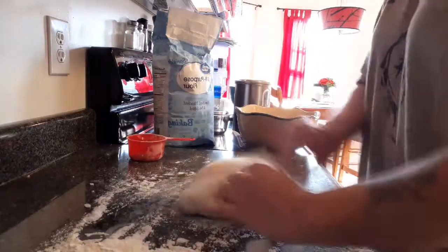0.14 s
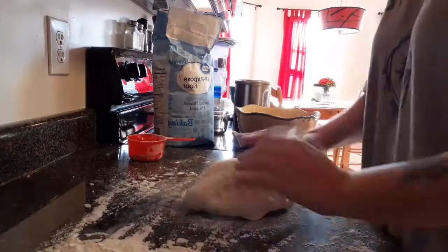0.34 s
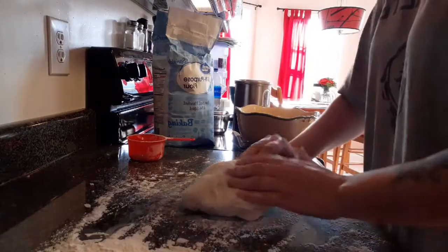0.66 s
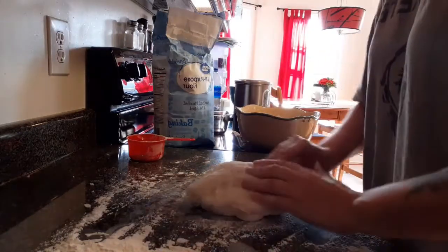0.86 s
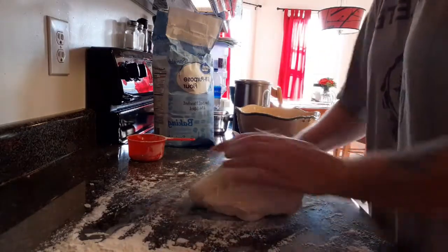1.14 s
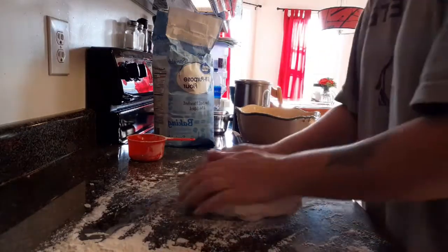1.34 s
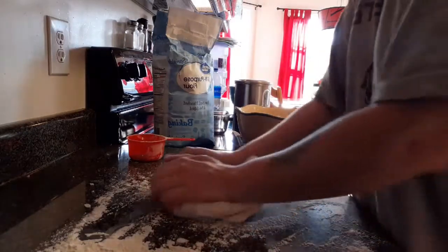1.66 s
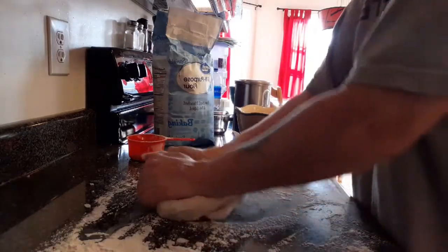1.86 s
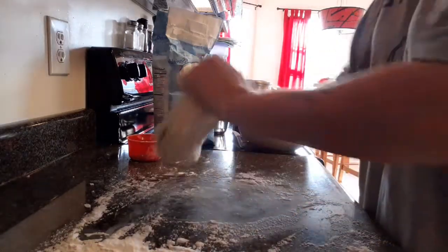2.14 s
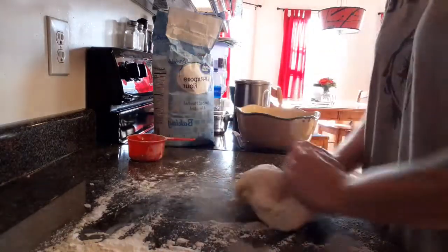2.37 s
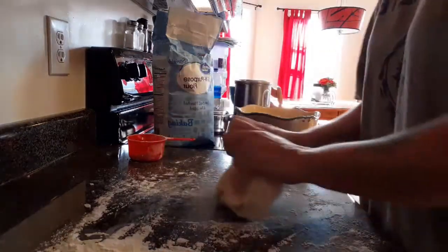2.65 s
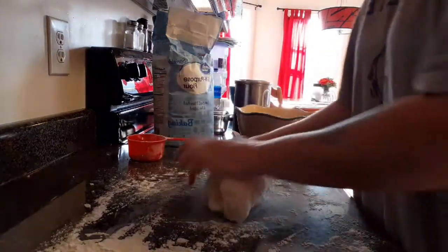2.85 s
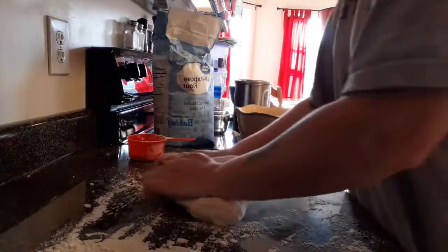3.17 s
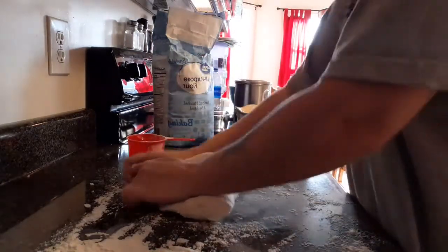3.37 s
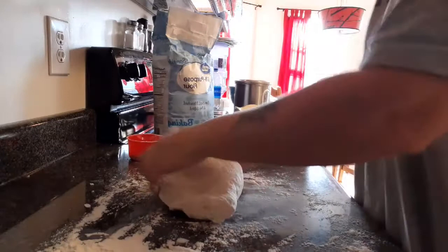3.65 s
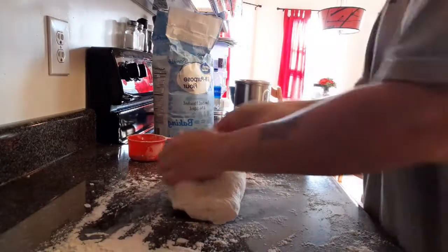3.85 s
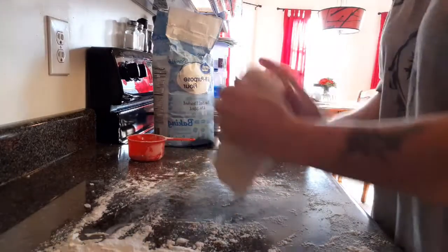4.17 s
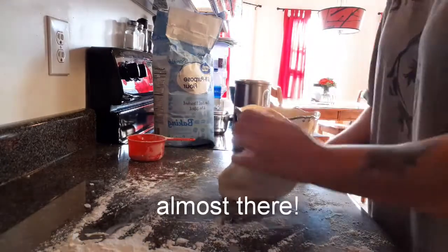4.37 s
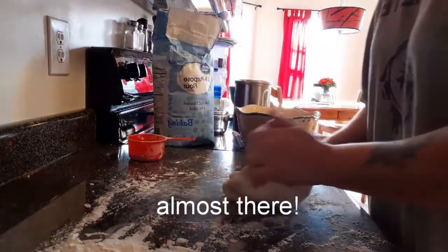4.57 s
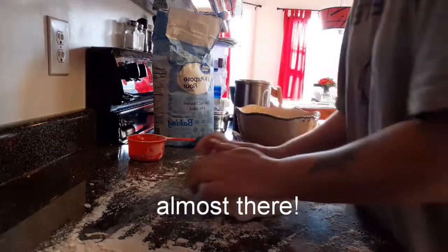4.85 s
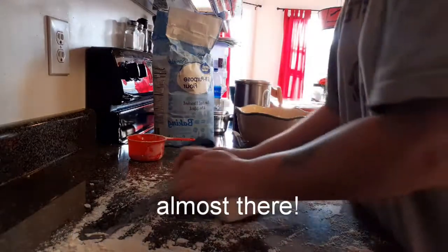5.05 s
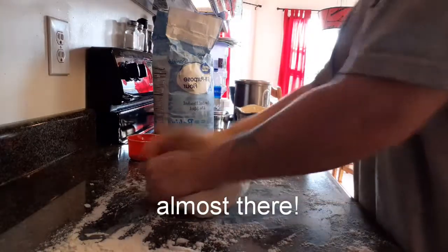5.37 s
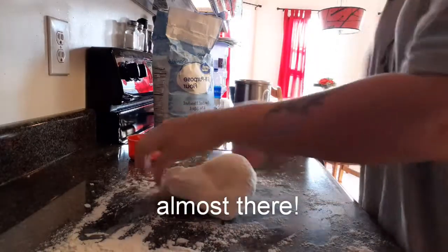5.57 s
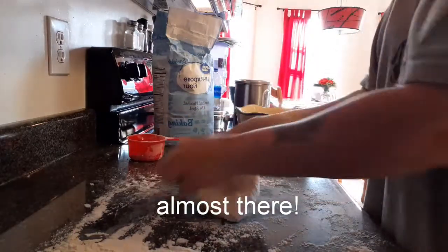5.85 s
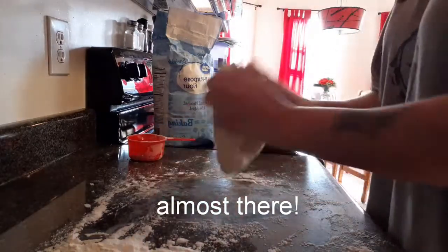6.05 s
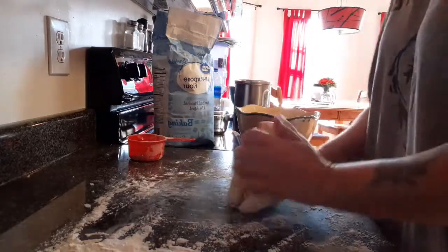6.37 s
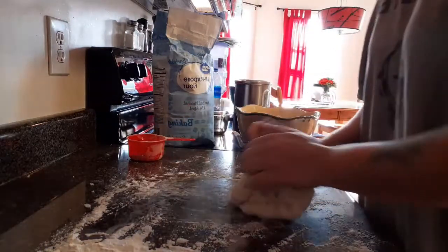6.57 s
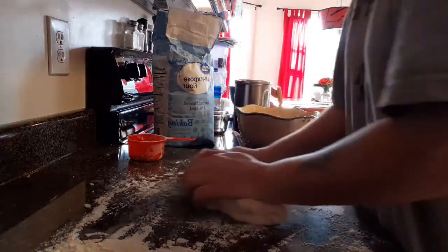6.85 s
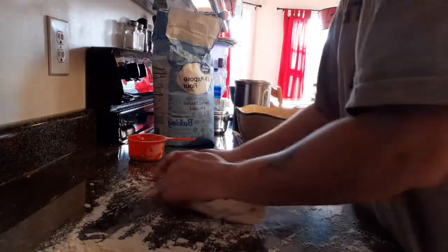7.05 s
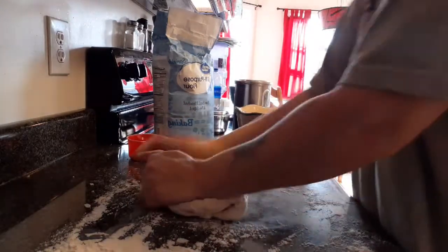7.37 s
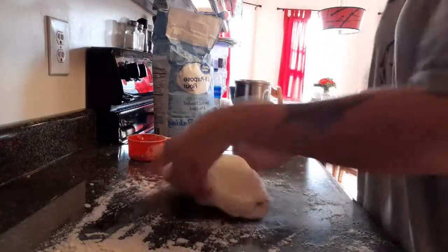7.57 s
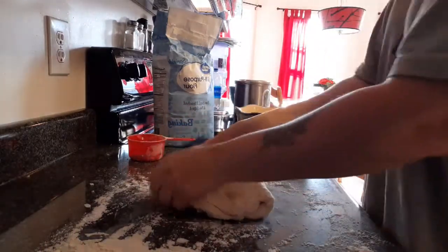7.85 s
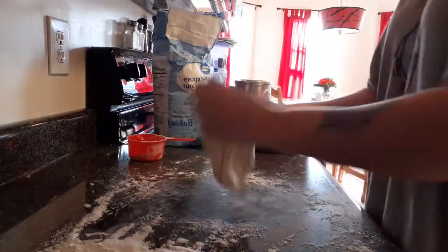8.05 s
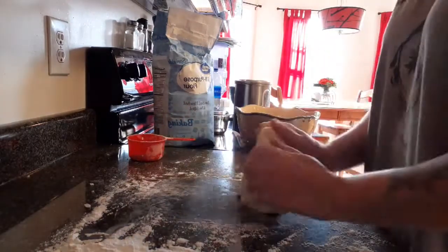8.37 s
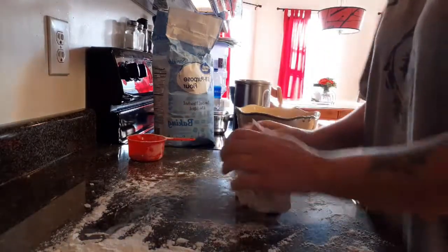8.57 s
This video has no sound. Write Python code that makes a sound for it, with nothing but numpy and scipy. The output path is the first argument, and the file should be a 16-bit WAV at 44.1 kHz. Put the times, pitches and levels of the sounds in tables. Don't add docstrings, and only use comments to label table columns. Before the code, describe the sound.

Close stereo phone pickup in a small kitchen with short reflections. A fridge hums low throughout, its thin whine clearest around 2.6-4 s, over faint microphone hiss. Palms scuff flour at the start; at 0.7 s dough slaps down with a deep, soft boom in the hollow cabinet, a fleshy smack and airy pop. Light pats and sticky rubs follow at 1.2-1.4 s, then dull dragging and flour hiss from 2 to 2.6 s. A second strong slap lands at 2.85 s, with small pops to 3.2 s. Softer folding and bumps come around 4-4.5 s. From 4.94 to 5.44 s thin metal scrapes stone in two gritty pulls, the first bright and ringing, the second duller and rattling. Muted thuds return at 5.9-6.3 and 6.8 s, with small squeaks near 7.2 s and rubbing at 7.6-8.1 s. A last hard thump hits at 8.3 s, followed by brief flour scuffs to 8.7 s.

```python
import sys
import numpy as np
from scipy import signal
from scipy.fft import rfft, irfft, next_fast_len
from scipy.io import wavfile
from scipy.ndimage import uniform_filter1d

SR = 44100
rng = np.random.default_rng(int(sys.argv[2]) if len(sys.argv) > 2 else 0)


def master(y):
    cut = np.clip(np.atleast_2d(y).T, -1, 1)
    pcm = np.round(cut * 32767)
    wavfile.write(sys.argv[1], SR, pcm.astype(np.int16))


def ratio(d):
    e = np.asarray(d, float) / 20
    return 10 ** e


N = 384552
FAST = next_fast_len(N, True)


def on_log(table, hz):
    f, v = np.transpose(table)
    return np.interp(np.log(np.maximum(hz, 1)), np.log(np.maximum(f, 1)), v)


def colour(x, table, lo_hz=1, hi_hz=20000):
    size = next_fast_len(x.shape[-1], True)
    hz = np.fft.rfftfreq(size, 1 / SR)
    spec = rfft(x, size) * ratio(on_log(table, hz)) * (hz > table[0][0]) * (hz < table[-1][0])
    inside = spec[:, (hz > lo_hz) & (hz < hi_hz)]
    power = np.mean(np.sum(np.abs(inside) ** 2, axis=1))
    return irfft(spec, size)[:, :x.shape[-1]] * size / np.sqrt(2 * power)


def band(x, hz, width):
    return signal.lfilter(*signal.iirpeak(hz, hz / width, SR), x)


def ring(hz, t60, t):
    return np.sin(2 * np.pi * hz * t) * ratio(-60 * t / t60)


def curve(points):
    t = np.arange(N) / SR
    s, db = np.transpose(points)
    return ratio(np.interp(t, s, db)) * (t >= s[0] - .005) * (t < s[-1] + .005)


def walk(rate, size=N):
    k = int(SR / rate)
    held = np.repeat(rng.standard_normal(size // k + 1), k)
    return 0.94 * uniform_filter1d(uniform_filter1d(held, k), k)[:size]


def grains(rate, depth_db):
    return rng.standard_normal((2, N)) * ratio(depth_db * walk(rate))


def add(out, x, s):
    i = int(s * SR)
    out[..., i:i + x.shape[-1]] += x[..., :N - i]


def thuds():
    # start in seconds, peak in dB, boom pitch in Hz
    blow_hits = [(0.682, -28.5, 132), (0.693, -15.5, 100), (0.732, -36, 104), (0.788, -38, 100),
                 (0.994, -41.5, 96), (1.018, -41, 74), (2.854, -18.5, 128.3), (2.889, -29, 122),
                 (2.919, -32, 158), (3.979, -36.5, 151), (3.987, -33.5, 104), (4.026, -44, 89.6),
                 (4.232, -43, 174), (4.291, -29, 122), (4.401, -39.5, 123), (4.507, -38, 119),
                 (5.502, -37.5, 143), (5.912, -35, 84), (5.944, -42.5, 142), (6.178, -39.5, 145),
                 (6.221, -31.5, 124), (6.246, -28, 120), (6.263, -44, 103), (6.792, -31.5, 118),
                 (7.468, -43.5, 142), (7.918, -37.5, 103), (7.944, -38, 87), (8.25, -31, 118),
                 (8.303, -31.5, 114), (8.319, -17, 103)]
    # start in seconds, peak in dB, boom pitch in Hz
    lean_hits = [(0.666, -25.5, 123), (1.914, -43.5, 124), (2.344, -45.5, 136), (2.456, -42, 118),
                 (2.9, -37, 74), (3.659, -50, 133), (3.811, -47, 116), (4.264, -32.5, 124),
                 (4.765, -41, 73.6), (5.1, -43, 116), (7.27, -44.5, 95), (7.684, -43.5, 116),
                 (8.365, -40, 96)]
    # pitch in Hz, T60 in seconds, level in dB
    cabinet_modes = [(73, 0.2, -2), (94, 0.035, 3.5), (118, 0.18, -15), (144, 0.19, -8.5),
                     (190, 0.17, 11.5)]
    blow_t60_s, press_t60_s = 0.051, 0.1
    out, t = np.zeros(N), np.arange(SR // 4) / SR
    for hits, t60 in ((blow_hits, blow_t60_s), (lean_hits, press_t60_s)):
        for s, db, hz in hits:
            blow = ring(hz, t60, t) * (1 - np.exp(-t / 0.0017))
            add(out, ratio(db) * blow / np.abs(blow).max(), s)
    t = np.arange(SR // 2) / SR
    boom = np.zeros(len(t))
    for k, (hz, t60, db) in enumerate(cabinet_modes):
        boom += (-1) ** k * ratio(db) * ring(hz, t60, t)
    out = out + ratio(-68) * signal.fftconvolve(out, boom)[:N]
    return signal.sosfilt(signal.butter(3, 52, "highpass", fs=SR, output="sos"), out)


def slaps():
    # start in seconds, peak in dB, pop pitch in Hz, smack share in dB
    slap_hits = [(0.664, -41.5, 306, -5.5), (0.674, -30, 253, -3), (0.689, -34.5, 255, -10),
                 (0.724, -43, 300, -6), (0.76, -46, 310, -12), (1.175, -45.5, 348, -6),
                 (1.185, -42, 306, -14), (1.2, -48.5, 475, -13), (1.372, -45.5, 380, -18),
                 (1.402, -52, 313, -10), (2.094, -48, 390, -6), (2.367, -46, 443, -8),
                 (2.383, -44, 443, -4), (2.85, -32, 263, -2.5), (3.012, -43, 388, -9),
                 (3.027, -39.5, 390, -11), (3.053, -43, 375, -20), (3.225, -46.5, 259, -9),
                 (4.048, -43, 248, -9), (4.229, -38, 257, -19), (4.287, -41.5, 261, -5.5),
                 (5.502, -45.5, 394, -4.5), (6.168, -43, 264, -13), (6.249, -51.5, 378, 1),
                 (6.793, -43.5, 248, -17), (8.316, -43.5, 248, -7)]
    smack_hz, slap_t60_s = 657, 0.073
    out, t = np.zeros((2, N)), np.arange(SR // 5) / SR
    shape = ratio(-60 * t / slap_t60_s) * (1 - np.exp(-t / 0.0025))
    for s, db, hz, smack_db in slap_hits:
        air = rng.standard_normal((6, len(t)))
        pop = band(band(air[:2], hz, .5 * hz), hz, 0.52 * hz)
        smack = band(band(air[2:4], smack_hz, 0.25 * smack_hz), smack_hz, 3.2 * smack_hz)
        crack = band(air[4:], 2000, 2300)
        bright = smack / smack.std() + ratio(-23.5) * crack / crack.std()
        add(out, ratio(db) * (pop / pop.std() + ratio(smack_db) * bright) * shape, s)
    return out


def touch(column, rest_db):
    # start in seconds, hold in seconds, flour hiss in dB, dough rub in dB
    slow_strokes = [(0.26, 0.04, -83, -79), (1.04, 0.019, -78, -70), (1.19, 0.072, -91, -72),
                    (1.36, 0.076, -92, -71), (2.0, 0.15, -72.5, -63), (2.18, 0.096, -80, -70.5),
                    (2.32, 0.036, -75.5, -64), (2.44, 0.025, -83, -64), (2.51, 0.011, -69.5, -70),
                    (2.6, 0.1, -92, -75.5), (3.61, 0.055, -99, -71.5), (3.85, 0.03, -91, -85),
                    (3.99, 0.081, -73, -65), (4.285, 0.025, -88, -63.5), (4.44, 0.039, -80, -69),
                    (4.53, 0.043, -72.5, -84), (4.71, 0.073, -80.5, -81), (4.89, 0.025, -77, -70.5),
                    (5.43, 0.2, -91, -68), (3.05, .03, -86, -80), (5.72, 0.07, -78, -75),
                    (5.86, .03, -84, -80), (6.285, 0.02, -73, -72), (6.47, 0.028, -78, -70.5),
                    (6.745, 0.0072, -80.5, -90), (7.0, 0.11, -85, -86), (6.63, 0.036, -84.5, -92.5),
                    (7.63, 0.1, -76.5, -67), (7.8, .07, -87, -75), (8.09, 0.13, -72.5, -70.5),
                    (8.565, 0.024, -70.5, -65.5), (8.71, .02, -84, -77)]
    # start in seconds, hold in seconds, flour hiss in dB, dough rub in dB
    quick_scuffs = [(0.0, 0.096, -77.5, -69), (0.675, 0.017, -66.5, -61), (0.72, 0.041, -79, -61.5),
                    (2.85, 0.0074, -66.5, -61), (2.89, 0.065, -74.5, -62), (3.115, 0.055, -71, -68.5),
                    (3.222, .075, -72, -77), (5.275, .025, -62.5, -58), (5.355, 0.02, -71, -72),
                    (5.905, 0.16, -74, -68.5), (6.222, .002, -74, -72), (6.3, 0.011, -70, -68),
                    (6.18, 0.046, -97, -62.5), (6.797, 0.015, -76.5, -62), (7.172, 0.042, -75.5, -85),
                    (7.265, 0.011, -72.5, -79), (7.915, 0.086, -70.5, -70), (8.316, 0.018, -72, -58),
                    (8.435, 0.035, -69.5, -68), (4.262, .04, -80, -75), (4.325, .008, -83, -74),
                    (3.19, .004, -76, -85)]
    t = np.arange(0, N / SR + .002, .001)
    gain = ratio(rest_db)
    for rows, rise, fall in ((slow_strokes, 246, 228), (quick_scuffs, 1500, 236)):
        for row in rows:
            before = np.maximum(row[0] - t, 0)
            after = np.maximum(t - row[0] - row[1], 0)
            gain = gain + ratio(row[column] - rise * before - fall * after)
    return np.interp(np.arange(N) / SR, t, gain)


def patchy(x, depth_db, rate):
    limits = 250 * 2 ** np.arange(0, 6.6, .5)
    hz, spec = np.fft.rfftfreq(FAST, 1 / SR), rfft(x, FAST)
    out = np.zeros((2, N))
    for lo, hi in zip(limits, limits[1:]):
        part = irfft(spec * ((hz >= lo) & (hz < hi)), FAST)[:, :N]
        out += ratio(depth_db * walk(rate)) * part
    return out


def hands():
    # frequency in Hz, level in dB per Hz
    flour_tone = [(1060, -36), (1800, 4), (2060, -2), (2320, 3), (3390, -2), (5190, 0.5), (6160, -2.5),
                  (8530, 2.5), (12600, -3.5), (15600, -6)]
    # frequency in Hz, level in dB per Hz
    dough_tone = [(180, -21), (300, -25.5), (388, 1), (433, -11.5), (533, -13), (643, -15), (1270, -15.5),
                  (3200, -48.5), (4160, -72), (7040, -120)]
    # start in seconds, length in seconds, pitch in Hz, level in dB
    broad_slips = [(0.667, 0.035, 1560, -56.5), (0.665, 0.014, 1190, -46.5), (0.686, .014, 1180, -46.5),
                   (1.173, 0.05, 760, -53), (1.363, 0.048, 800, -60.5), (2.002, 0.45, 5300, -78.5),
                   (2.0, 0.18, 167, -60.5), (2.85, 0.014, 1300, -42), (2.853, .01, 2750, -58),
                   (2.865, 0.058, 1720, -60.5), (3.11, 0.079, 1480, -75), (3.221, 0.023, 2840, -71.5),
                   (4.045, 0.043, 1390, -59.5), (4.033, 0.062, 2920, -72), (5.1, 0.29, 183, -61),
                   (7.598, 0.13, 2240, -80), (7.752, 0.48, 1370, -74.5), (5.899, 0.24, 1440, -71.5),
                   (6.173, 0.11, 2150, -76), (6.794, 0.027, 740, -59.5), (7.911, 0.091, 4250, -71.5),
                   (8.433, 0.09, 4540, -72), (8.547, 0.078, 1860, -78), (8.314, .03, 1050, -56),
                   (5.39, .27, 5000, -83), (5.6, .3, 8600, -82), (0.22, .09, 8400, -78),
                   (1.172, .045, 1500, -71), (1.175, .04, 3800, -84), (1.37, .04, 1500, -77),
                   (4.227, .02, 1100, -63), (5.196, .07, 3300, -59), (5.064, .04, 2300, -58),
                   (5.22, .06, 1100, -60), (7.71, .2, 8500, -85), (1.982, .02, 1300, -72),
                   (1.68, .015, 900, -72), (7.262, .03, 4800, -82)]
    # start in seconds, length in
    # seconds, pitch in Hz, level in dB
    narrow_slips = [(0.01, .06, 5250, -79), (0.395, .04, 8400, -84), (1.13, .08, 8500, -85),
                    (1.27, .09, 8500, -87), (1.01, 0.054, 2280, -83), (1.969, 0.6, 1570, -74),
                    (2.853, 0.09, 388, -50), (3.985, 0.024, 2170, -70.5), (4.502, .1, 8900, -75),
                    (4.838, 0.1, 1780, -76), (4.84, .09, 2290, -78), (4.845, .08, 2020, -78),
                    (4.843, 0.087, 6770, -84), (7.168, 0.016, 3120, -80), (7.186, .024, 3180, -77),
                    (7.18, 0.042, 2300, -81), (7.156, .018, 1850, -81), (7.2, .06, 3780, -86),
                    (7.268, .03, 2480, -80), (7.295, .018, 2620, -83), (7.19, .03, 4570, -86),
                    (5.39, 0.25, 1230, -69.5), (5.76, .025, 2900, -82), (4.258, .03, 1450, -68),
                    (4.295, .02, 2250, -74), (7.795, .06, 5200, -84), (7.95, .04, 4350, -78),
                    (8.565, .04, 1870, -76), (3.09, .035, 8200, -78), (2.086, 0.057, 383, -58.5),
                    (2.374, .05, 457, -51.5), (3.01, .03, 393, -50), (3.017, .025, 765, -52),
                    (3.051, .045, 398, -55.5), (8.313, 0.03, 3880, -72), (8.34, .045, 3800, -79)]
    flour = colour(grains(90, 1.54), flour_tone, 1360, 22500)
    dough = colour(grains(40, 2.3), dough_tone, 376, 2500)
    rub = touch(column=2, rest_db=-95) * flour + touch(column=3, rest_db=-77.5) * dough
    out = patchy(rub, depth_db=1.6, rate=8.2)
    for rows, share in ((broad_slips, 0.29), (narrow_slips, 0.072)):
        for s, length, hz, db in rows:
            noise = rng.standard_normal((2, SR // 2))
            slip = band(band(noise, hz, share * hz), hz, 2 * share * hz)[:, -int(length * SR):]
            size = slip.shape[1]
            shape = signal.windows.tukey(size, .4) * np.linspace(1.3, .6, size)
            add(out, ratio(db) * slip / slip.std() * shape, s)
    return out


def wandering_modes(grit, modes, lo, hi):
    bright_db = 2.6
    swell_db = 4.5
    total = 0
    for hz, w, db in modes:
        if lo < hz < hi:
            gain = ratio(db + bright_db * np.log2(hz / 2000) + swell_db * walk(45, size=grit.shape[1]))
            total = total + gain * np.sqrt(300 / w) * band(grit, hz, w)
    return total


def drag():
    # frequency in Hz, level in dB per Hz
    scrape_tone = [(150, -23), (250, 7), (282, 2.5), (931, -4), (1770, -9), (2030, -9.5), (2290, -9),
                   (10300, -13), (11400, -11.5), (15600, -18)]
    # pitch in Hz, width in Hz, level in dB
    metal_modes = [(1780, 56, -2), (2230, 32, 0), (3010, 57, -6), (3450, 59, -5), (3920, 41, -4),
                   (5420, 33, -5), (5880, 61, -10), (6530, 82, -10), (8070, 90, -7), (8420, 23, -12),
                   (8800, 61, -11), (9820, 55, -9), (11300, 66, -6), (15300, 82, -14),
                   (1600, 30, -9), (2560, 110, -5), (4420, 62, -11), (5110, 120, -9), (6950, 62, -13),
                 (7470, 88, -13), (12700, 150, -16), (14100, 54, -18)]
    # pitch in Hz, width in Hz, level in dB
    rattle_modes = [(807, 21, -11.5), (1070, 38, -6), (1240, 35, -10), (1580, 73, -12), (2240, 35, -12),
                    (2500, 31, -10), (2760, 100, -8), (3250, 51, -8), (3940, 150, -6), (4410, 51, -8),
                    (5090, 62, -9), (5420, 34, -14), (6690, 66, -12), (8060, 47, -14)]
    # time in seconds, level in dB
    push = [
        (4.938, -76),
        (4.946, -53),
        (4.99, -49),
        (5.055, -53),
        (5.066, -47.5),
        (5.14, -53),
        (5.195, -60),
        (5.198, -49.5),
        (5.265, -52),
        (5.44, -77),
    ]
    # level in first pull in dB, level in second pull in dB, drift within a pull in dB/s
    layer_levels = [
        (1, -3.5, -6.5),
        (0, -1, 2),
        (0, -14.5, -39),
        (-9, -2.5, 35),
    ]
    layer_hz = [(2800, 7500), (1500, 2800), (7500, 15700), (250, 1500)]
    start_s, second_s = push[0][0], 5.17
    span = slice(int(start_s * SR) - SR // 4, int(start_s * SR) + SR)
    t = np.arange(N)[span] / SR
    since = t - np.where(t < second_s, start_s, second_s)
    second = np.clip((t - second_s) / 0.086 + .5, 0, 1)
    grit = colour(grains(70, 1.5)[:, span], scrape_tone)
    pressure = curve(push)[span]
    out = np.zeros((2, N))
    for (lo, hi), (first_db, last_db, drift) in zip(layer_hz, layer_levels):
        part = signal.sosfilt(signal.butter(3, (lo, hi), "bandpass", fs=SR, output="sos"), grit)
        part = part / part.std()
        first = wandering_modes(part, metal_modes, lo, hi)
        last = wandering_modes(part, rattle_modes, lo, hi)
        part = part + ratio(3) * (1 - second) * first + ratio(6) * second * last
        steady = part / np.sqrt(uniform_filter1d(np.mean(part ** 2, axis=0), SR // 12))
        out[:, span] += pressure * ratio(first_db * (1 - second) + last_db * second + drift * since) * steady
    return out


def kitchen():
    # frequency in Hz, level in dB per Hz
    air_tone = [(18, -48), (30, -8), (44, -3.5), (124, -1.5), (309, -9.5), (402, -19.5), (433, -11),
                (494, -13), (1210, -30.5), (1430, -54), (2000, -41.5), (2600, -59), (3380, -81),
                (5720, -120)]
    # pitch in Hz, level in dB
    hum_lines = [(59.2, -63), (118.4, -63.5), (242.2, -70), (403.7, -73.5), (543.7, -78), (764.4, -82),
                 (1238, -87)]
    # time in seconds, level in dB
    whine_level = [
        (0, -99),
        (.8, -96),
        (2.3, -99),
        (2.6, -87),
        (3.5, -85.5),
        (4.6, -91.5),
        (5.5, -101),
        (7.5, -101),
        (8.72, -106),
    ]
    # frequency in Hz, level in dB per Hz
    hiss_tone = [(1290, -29), (2200, -11.5), (2310, -1), (2860, -6), (3750, -4), (3940, -4), (5840, -11),
                 (6440, -12.5), (12200, -9), (15600, -14)]
    noise, t = colour(rng.standard_normal((2, N)), air_tone), np.arange(N) / SR
    bass = signal.sosfilt(signal.butter(2, 400, fs=SR, output="sos"), noise)
    air = bass * ratio(walk(6.9)) + (noise - bass) * ratio(walk(3.12))
    hum = np.zeros((2, N))
    for hz, db in hum_lines:
        phase = 0.74 * walk(5.1) + rng.uniform(0, 7.83, (2, 1))
        hum += ratio(db + 4.1 * walk(14)) * np.sin(2 * np.pi * hz * t + phase)
    whine = curve(whine_level) * np.sin(2 * np.pi * 1940 * t + .4 * walk(5))
    hiss = colour(rng.standard_normal((2, N)), hiss_tone)
    hiss = hiss + ratio(3) * band(hiss, 8500, 500)
    return ratio(-87.5) * hiss + ratio(-56) * air + np.sqrt(2) * (hum + whine)


def room(x):
    t60_s, room_db = 0.35, -6
    t = np.arange(int(.5 * SR)) / SR
    tail = rng.standard_normal((2, len(t))) * ratio(-60 * t / t60_s) * (t > .006)
    tail = tail / np.sqrt(np.sum(tail ** 2, axis=1, keepdims=True))
    return ratio(room_db) * signal.fftconvolve(x, tail, axes=1)[:, :N]


def scene():
    # frequency in Hz, side minus mid in dB
    side_level = [(60, -19), (110, -20), (200, -15.5), (380, -9), (700, -0.5), (1290, 0), (2380, 0.5),
                  (4400, 0.5), (8120, 0), (15000, -0.5)]
    # frequency in Hz, left minus right in dB
    left_level = [(60, 2.0), (110, 2.0), (200, 1.0), (380, 1.0), (700, 1.0), (1290, -1.5), (2380, -1.0),
                  (4400, -1.5), (8120, 0.5), (15000, 1.5)]
    lead = 6
    blows = thuds() * np.array([[1], [.15]]) + slaps()
    hz = np.fft.rfftfreq(FAST, 1 / SR)
    mid, side = rfft(blows + room(blows) + hands() + drag() + kitchen(), FAST)
    side = side * ratio(on_log(side_level, hz))
    turn = np.exp(2j * np.pi * hz * lead / SR * np.exp(-hz / 500))
    pair = np.array([mid * turn + side, mid / turn - side])
    balance = ratio(np.outer([.5, -.5], on_log(left_level, hz)))
    return irfft(pair * balance, FAST)[:, :N]


def roll_off(x):
    return signal.sosfilt(signal.butter(12, 15780, fs=SR, output="sos"), x)


def record(dry):
    x = signal.sosfilt(signal.butter(6, 46, "highpass", fs=SR, output="sos"), dry)
    return roll_off(x)


dry = scene()
out = record(dry)
master(out)
```